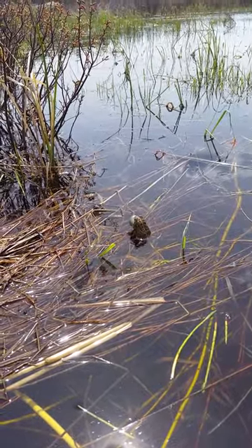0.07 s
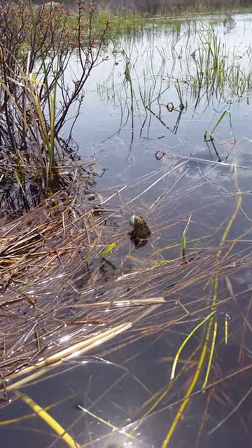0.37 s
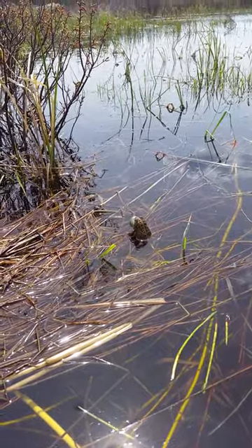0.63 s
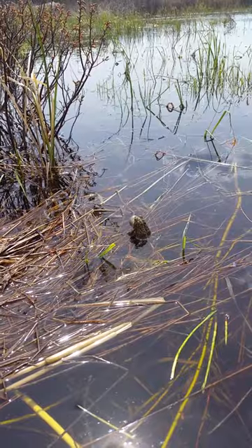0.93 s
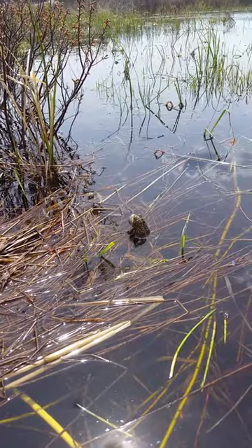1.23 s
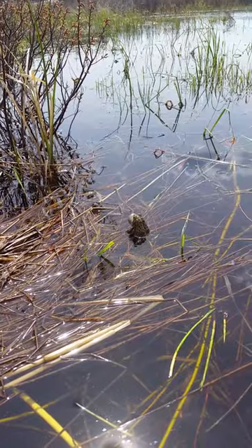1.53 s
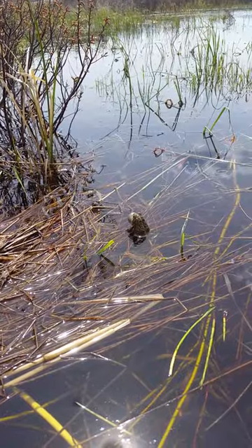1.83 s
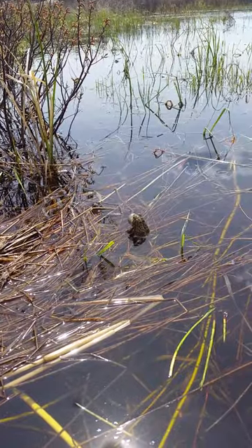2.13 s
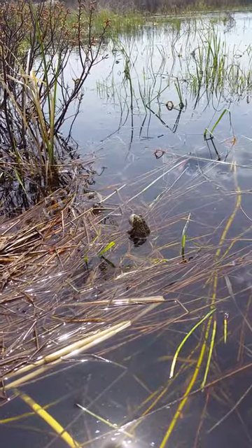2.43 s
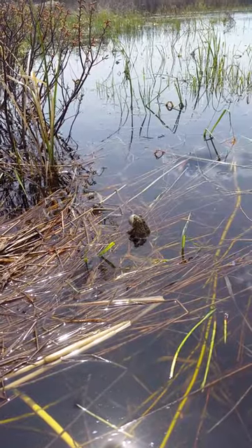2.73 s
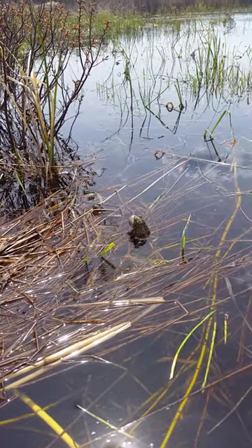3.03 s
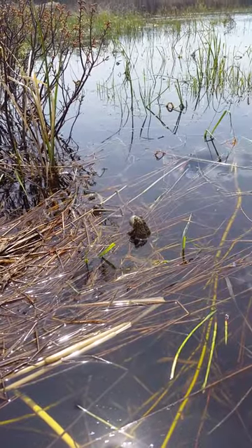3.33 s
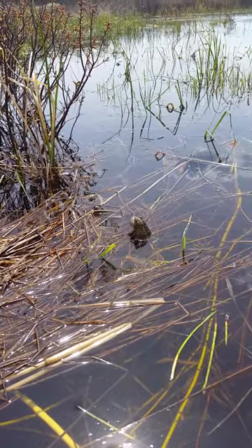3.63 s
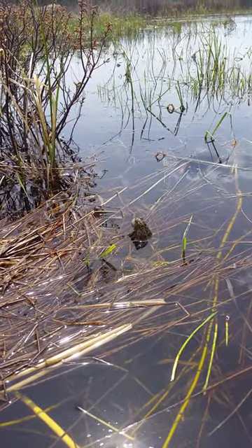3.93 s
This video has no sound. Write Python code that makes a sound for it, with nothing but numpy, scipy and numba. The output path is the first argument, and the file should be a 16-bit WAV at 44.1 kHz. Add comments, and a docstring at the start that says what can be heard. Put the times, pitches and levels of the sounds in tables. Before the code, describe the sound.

Toads trill loudly close by in fast pulses, with faint wind rumble behind.

```python
"""Two toads trill close by at a lake's edge; the lower stops first. Each pulse is one push of air that
sets the vocal folds oscillating, and the unequal pulse rates drift in and out of step. A faster toad
trills farther off, and a fourth chirps at the end, just after two reed ticks and a bubble. Reeds and
shore scatter the calls over a distant chorus. Light wind buffets the microphone, whose gain control
ducks when the pulses coincide."""
import sys
import numpy as np
from scipy import signal
from scipy.fft import rfft, irfft
from scipy.io import wavfile
from scipy.ndimage import uniform_filter1d
from numba import njit

SR = 44100
rng = np.random.default_rng(int(sys.argv[2]) if len(sys.argv) > 2 else 0)


def wav_record(signal):
    """Record a signal, one row per channel, as 16-bit PCM in the file named by sys.argv[1]."""
    frames = np.transpose(np.atleast_2d(signal))
    bounded = np.clip(frames, -1, 1)
    # unit amplitude maps onto the largest positive 16-bit level
    quanta = np.round(bounded * 32767).astype(np.int16)
    wavfile.write(sys.argv[1], SR, quanta)


N = 176400

# trill speed; each toad slows as it runs out of air (time [s], pulse rate [1/s])
LOW_PULSE_RATE = [(0, 44.35), (.25, 43.65), (.5, 43.92), (.85, 43.64), (1, 42.62), (1.12, 36.07)]
HIGH_PULSE_RATE = [(0, 46.57), (.2, 46.66), (.5, 45.55), (.9, 45.53), (1.3, 44.68), (1.7, 44.64),
                   (2.15, 44.33), (2.3, 43.38), (2.45, 44), (2.6, 42.74), (2.75, 44.08), (3.25, 43.71),
                   (3.55, 41.47), (3.68, 45.33), (3.75, 32.67)]
FAR_PULSE_RATE = [(0, 64), (1.4, 61), (2.7, 58.6), (3.1, 59), (3.75, 57.3), (4, 57.3)]
# loudness of each trill as heard, including the microphone's gain control
# ducking and slowly recovering (time [s], gain [dB])
LOW_GAIN = [(0, -5.5), (.2, -4), (0.701, -3.5), (0.901, -6), (1.121, -3.5)]
HIGH_GAIN = [(0, -7), (.2, -4.5), (0.422, -6), (.7, -4), (0.901, -6), (1.1, -5.5), (1.599, -5.5),
             (1.999, -4), (3.748, -3.5)]
FAR_GAIN = [(0, -32), (1.2, -29), (2.2, -25), (2.999, -27.5), (3.798, -29.5), (4, -24.5)]
# harmonics, from the fundamental up (left gain [dB], right gain [dB])
LOW_HARMONICS = [(0.5, -14.5), (-31.5, -35.5), (-40.5, -52), (-58, -72)]
HIGH_HARMONICS = [(0, -12.3), (-42, -37), (-47, -62), (-68, -78)]
FAR_HARMONICS = [(-0.5, -13.5), (-37, -40.5), (-27, -38), (-56.5, -64), (-38, -57.5)]
CHIRP_HARMONICS = [(2, -7), (-4.5, -13.5), (-34, -29), (-26, -34)]
# how well the bodies radiate the low side of a call (frequency [Hz], gain [dB])
BODY_RADIATION = [(500, -3.5), (850, 1.5), (1000, -8.5), (1200, 1.5), (1450, 0), (1700, 0)]
# spectra of the chorus in open air and of the wind (frequency [Hz], relative density [dB])
CHORUS_SPECTRUM = [(300, -28), (600, -27.5), (900, -22), (1300, -19.5), (1600, -9), (1850, 3.5),
                   (2100, -11), (2400, -20.5), (3700, -22.5), (4700, -37.5), (6000, -30.5), (7000, -52),
                   (9000, -50.5), (16000, -50.5)]
WIND_SPECTRUM = [(13, -27), (22, 3.5), (53, 4.5), (98, 1), (148, -8.5), (241, -23), (443, -30.5),
                 (600, -38), (780, -65.5), (1320, -120)]
# slow swell of the wind (time [s], gain [dB])
WIND_SWELL = [(0, 3.1), (1, -2.45), (1.7, -1.2), (2.1, 0.95), (3, 1.5), (4, 2.8)]
# puffs on the microphone (time [s], frequency [Hz], left level [dB], right level [dB])
WIND_PUFFS = [(0.312, 150, -41.5, -20.5), (1.943, 160, -56, -33.5), (2.031, 90, -41, -24),
              (2.108, 70, -36, -29), (2.367, 110, -42, -24), (2.69, 90, -25.5, -50),
              (2.815, 90, -29.5, -29.5), (3.382, 145, -49, -22.5), (3.451, 80, -52, -25),
              (3.814, 145, -49, -17.5), (3.832, 170, -50, -29), (3.863, 140, -53, -26)]
# snaps of dry reeds (time [s], gain [dB])
REED_TICKS = [(3.779, -42), (3.79, -43)]
# pulses of the fourth toad (time [s], pitch [Hz], gain [dB])
CHIRP_PULSES = [(3.924, 1130, -40.5), (3.944, 1215, -32), (3.966, 1245, -31.5), (3.984, 1340, -29.5)]

LOW_SPAN_S, HIGH_SPAN_S, FAR_SPAN_S = (.0093, 1.13), (.0071, 3.755), (.0112, 4.01)  # start, end
LOW_HZ, HIGH_HZ, FAR_HZ, SAG_HZ_PER_S = 1853.3, 1971.8, 2071.5, 4.2  # first mid-pulse pitches; their sag
JITTER_S, SCATTER_DB, SCATTER_HZ = .0003, -0.69, 1.4  # variation from pulse to pulse
SOFT_CLOSE, ONSET_S, LEAN = 0.23, .0009, 0.36  # envelope of a pulse; it leans towards its start
SLACK_PITCH, BUZZ_DRIVE = 0.51, 4.9  # share of the pitch left in slack folds; how soon overtones build
SNAP_HZ, SNAP_RISE_S, SNAP_DECAY_S = 2750, 0.00048, 0.0007  # ring of the throat as the folds open
RASP_BAND_HZ, RASP_DB = (2460, 3930), -36
REEDS_DB, REEDS_DECAY_S, SHORE_DB, SHORE_DECAY_S = -24.5, 0.0027, -22.5, 0.17
CHORUS_DB, WIND_DB = (-39, -44), (-46, -41.5)  # left, right
GUST_DB, KNOCK_HZ, KNOCK_DB = 7.5, 330, -19  # swing of the gusts; the sharper core of a puff
PLOP_S, PLOP_HZ, PLOP_DB, PLOP_DECAY_S = 3.787, 732, -43, 0.004
LIMIT_DB, ATTACK_S, RELEASE_S, TOP_HZ = -4.5, 0.00066, 0.051, 16000


def undb(db):
    """Amplitude grows tenfold for every 20 dB."""
    return 10 ** (np.asarray(db) / 20)


def curve(rows, x):
    """Linear interpolation through (x, value) rows."""
    return np.interp(x, *np.array(rows).T)


def noise(spectrum):
    """Spectral shaping of white noise: uncorrelated left and right, rms 1."""
    hz, db = np.array(spectrum).T
    f = np.maximum(np.arange(N // 2 + 1) * SR / N, 1)
    gain = undb(np.interp(np.log(f), np.log(hz), db))
    rolloff = (1 + (f / hz[-1]) ** 6) * (1 + (hz[0] / 2 / f) ** 2)
    x = irfft(rfft(rng.standard_normal((2, N))) * gain / rolloff, N)
    return x / x.std()


def drift(rate_hz):
    """Smoothing random steps gives a slow fluctuation."""
    k = int(SR / rate_hz)
    steps = np.repeat(rng.standard_normal(N // k + 1), k)
    return 0.95 * uniform_filter1d(uniform_filter1d(steps, k), k)[:N]


def add(out, centre_s, x):
    """Superposition of a short stereo sound, centred on a time."""
    i = int(centre_s * SR) - x.shape[1] // 2
    a, b = max(i, 0), min(i + x.shape[1], N)
    if b > a:
        out[:, a:b] += x[:, a - i:b - i]


def larynx_pulse(hz, harmonics, length_s, arch, droop, fall, lag_s, snap_db):
    """Flow-driven oscillation: the folds snap open, level and pitch arch, and pitch drops at closure."""
    t = np.arange(-441, 442) / SR
    x = t / (length_s / 2)  # -1 at opening, +1 at closure
    age = np.maximum(t + length_s / 2, 0)
    push = np.cos(np.pi / 2 * np.clip(x, -2, 2))
    env = SOFT_CLOSE * np.logaddexp(0, push / SOFT_CLOSE)
    env *= np.minimum(age / ONSET_S, 1) * np.exp(-LEAN * x)
    tension = (1 - fall * np.clip(x, -1, 1)) / (1 + arch * x ** 2 + droop * x ** 6)
    pitch = hz * (SLACK_PITCH + (1 - SLACK_PITCH) * tension)
    lead_s = np.array([[0], [lag_s]])  # with a negative lag the left side leads
    phase = 2 * np.pi * (np.cumsum(pitch * (age > 0)) / SR + lead_s * pitch)
    buzz = np.tanh(BUZZ_DRIVE * env)  # overtones are full as soon as the folds touch
    tone = sum(undb(db)[:, None] * (buzz if k else env) * np.sin((k + 1) * phase)
               for k, db in enumerate(harmonics))
    snap = undb(snap_db) * np.sin(2 * np.pi * SNAP_HZ * age)
    snap *= np.exp(-age / SNAP_DECAY_S) * np.minimum(age / SNAP_RISE_S, 1)
    band = signal.butter(3, RASP_BAND_HZ, "band", fs=SR, output="sos")
    rasp = undb(RASP_DB) * signal.sosfilt(band, buzz * rng.standard_normal((2, len(t))))
    return tone + undb(harmonics[0])[:, None] * (snap + rasp)


def trill(rate, span_s, level, hz, harmonics, length_s, **shape):
    """A quasi-periodic pulse train: the integral of the rate sets when each pulse falls."""
    t = np.arange(*span_s, 1 / SR)
    cycles = np.cumsum(curve(rate, t)) / SR
    out = np.zeros((2, N))
    for s in np.interp(np.arange(int(cycles[-1]) + 1), cycles, t):
        late, loud, sharp, long = rng.standard_normal(4)
        pitch = hz - SAG_HZ_PER_S * s + SCATTER_HZ * sharp
        pulse = larynx_pulse(pitch, harmonics, length_s * (1 + 0.016 * long), **shape)
        add(out, s + JITTER_S * late, pulse * undb(curve(level, s) + SCATTER_DB * loud))
    return out


def trilling_toads():
    """Two near pulse trains and a far one superpose; unequal rates carry them in and out of step."""
    low = trill(LOW_PULSE_RATE, LOW_SPAN_S, LOW_GAIN, LOW_HZ, LOW_HARMONICS,
                length_s=.0108, arch=.077, droop=.55, fall=.006, lag_s=-.00012, snap_db=-21)
    high = trill(HIGH_PULSE_RATE, HIGH_SPAN_S, HIGH_GAIN, HIGH_HZ, HIGH_HARMONICS,
                 length_s=.0104, arch=.14, droop=.46, fall=.0054, lag_s=-.00016, snap_db=-23)
    far = trill(FAR_PULSE_RATE, FAR_SPAN_S, FAR_GAIN, FAR_HZ, FAR_HARMONICS,
                length_s=.0075, arch=.015, droop=.06, fall=.046, lag_s=-.000092, snap_db=-6.5)
    return low + high + far


def radiate(calls):
    """The radiation efficiency of the small bodies varies with frequency, colouring the low side."""
    f = np.arange(N // 2 + 1) * SR / N
    return irfft(rfft(calls) * undb(curve(BODY_RADIATION, f)), N)


def echoes(calls):
    """Diffuse reflection decays exponentially: quickly from the reeds, slowly from the shore."""
    t = np.arange(SR // 2) / SR
    out = 0
    for db, decay_s in ((REEDS_DB, REEDS_DECAY_S), (SHORE_DB, SHORE_DECAY_S)):
        response = rng.standard_normal((2, len(t))) * np.exp(-t / decay_s) * (t > .002)
        response *= undb(db) / np.sqrt((response ** 2).sum(axis=1, keepdims=True))
        out = out + signal.fftconvolve(calls[:1], response, axes=1)[:, :N]
    return out * undb([[0], [-5]])


def distant_chorus():
    """Far calls and open air sum incoherently to a wavering noise that peaks near the toads' pitch."""
    return noise(CHORUS_SPECTRUM) * undb(np.array(CHORUS_DB)[:, None] + 1.5 * drift(40))


def wind():
    """Turbulent pressure at each microphone port gives a separate gusty rumble, with single soft puffs."""
    gust_db = GUST_DB * np.tanh([drift(25), drift(25)]) + curve(WIND_SWELL, np.arange(N) / SR)
    out = noise(WIND_SPECTRUM) * undb(np.array(WIND_DB)[:, None] + gust_db)
    t = np.arange(-1323, 1324) / SR
    for s, hz, left_db, right_db in WIND_PUFFS:
        u, v = (np.pi * hz * t) ** 2, (np.pi * KNOCK_HZ * t) ** 2
        puff = (2 * u - 1) * np.exp(-u)
        knock = undb(KNOCK_DB) * (2 * v - 1) * np.exp(-v)
        add(out, s, undb([[left_db], [right_db]]) * (puff + knock))
    return out


def reed_ticks():
    """Dry reeds snap in brief broadband transients, of which only the high treble is kept."""
    out, t = np.zeros((2, N)), np.arange(-441, 442) / SR
    decay = np.exp(-abs(t) / .0012) * (t >= 0)
    for s, db in REED_TICKS:
        add(out, s, undb(db) * rng.standard_normal((2, len(t))) * decay)
    return signal.sosfilt(signal.butter(2, 9500, "high", fs=SR, output="sos"), out)


def bubble_plop():
    """A small bubble bursting at the surface rings as a damped oscillator."""
    out, age = np.zeros((2, N)), np.maximum(np.arange(-1764, 1765) / SR, 0)
    ring = np.sin(2 * np.pi * PLOP_HZ * age) * np.exp(-age / PLOP_DECAY_S)
    add(out, PLOP_S, undb(PLOP_DB) * ring[None])
    return out


def chirping_toad():
    """The folds of a fourth toad oscillate at a lower frequency, in a few pulses of rising pitch."""
    out = np.zeros((2, N))
    for s, hz, db in CHIRP_PULSES:
        pulse = larynx_pulse(hz, CHIRP_HARMONICS,
                             length_s=.01, arch=.36, droop=.36, fall=.04, lag_s=.00005, snap_db=-14)
        add(out, s, undb(db) * pulse)
    return out


def scene():
    """Sound pressures add linearly: toads, echoes, chorus, wind, reeds and water."""
    calls = radiate(trilling_toads() + chirping_toad())
    chorus = distant_chorus()
    return calls + echoes(calls) + chorus + wind() + reed_ticks() + bubble_plop()


@njit
def follow(x, attack, release):
    """Envelope detection by a first-order lag, with separate rates of rise and fall."""
    out, level = np.empty(len(x)), 0.
    for i in range(len(x)):
        level += (x[i] - level) * (attack if x[i] > level else release)
        out[i] = level
    return out


def record(dry):
    """Limiting: above a threshold, gain varies inversely with the envelope; a low-pass cuts the top."""
    env = follow(np.abs(dry).max(axis=0), 1 / (1 + ATTACK_S * SR), 1 / (1 + RELEASE_S * SR))
    held = dry / np.maximum(env / undb(LIMIT_DB), 1)
    return signal.sosfilt(signal.ellip(8, .2, 70, TOP_HZ, fs=SR, output="sos"), held)


dry = scene()
out = record(dry)
wav_record(out)
```